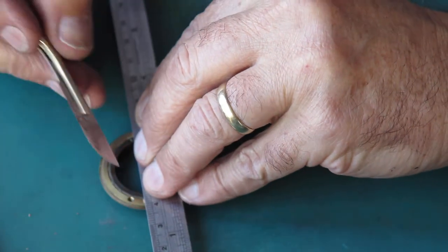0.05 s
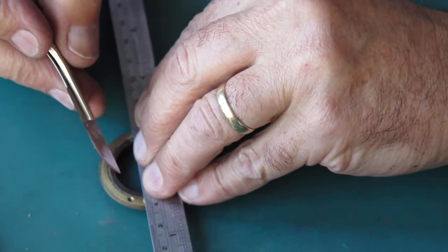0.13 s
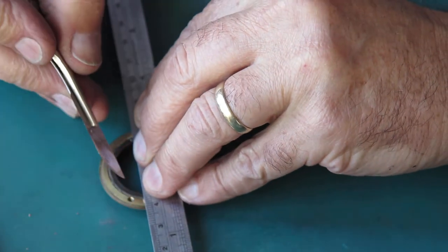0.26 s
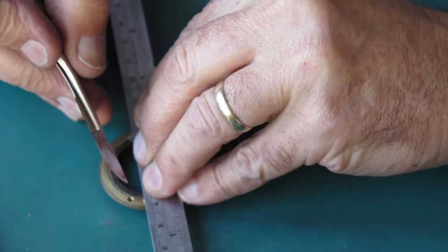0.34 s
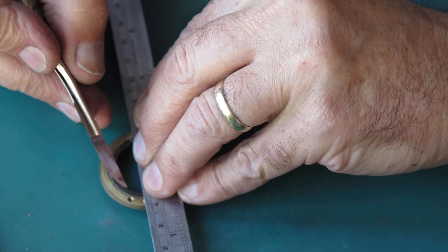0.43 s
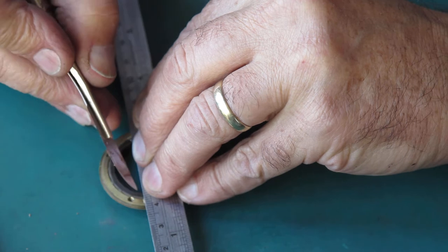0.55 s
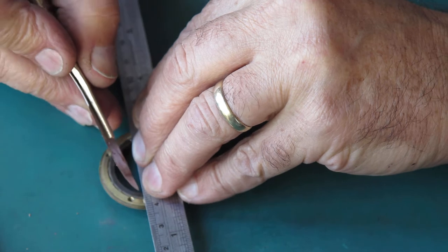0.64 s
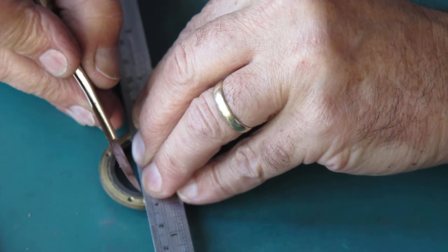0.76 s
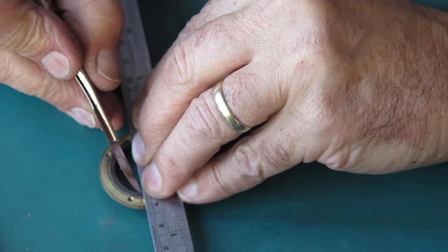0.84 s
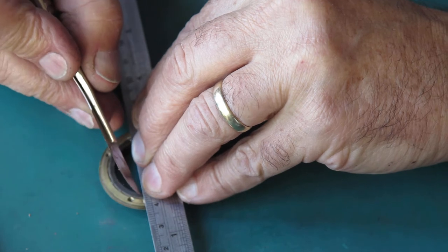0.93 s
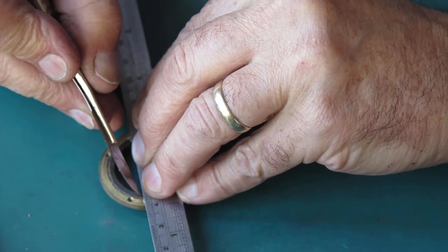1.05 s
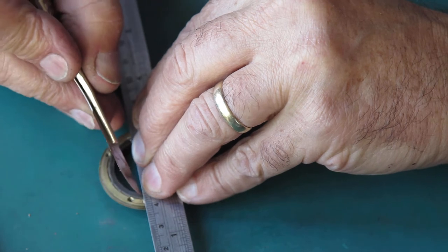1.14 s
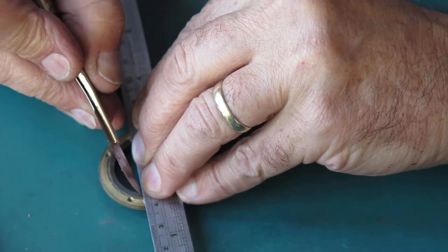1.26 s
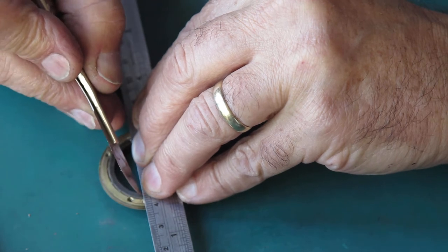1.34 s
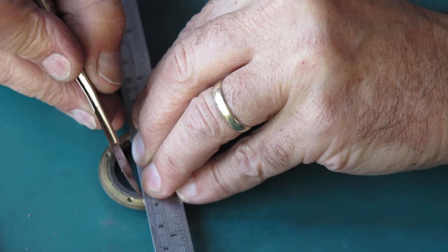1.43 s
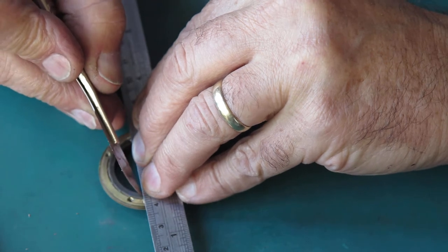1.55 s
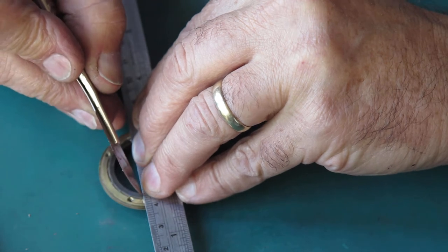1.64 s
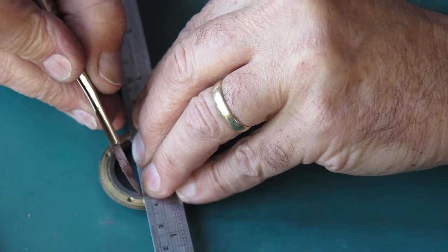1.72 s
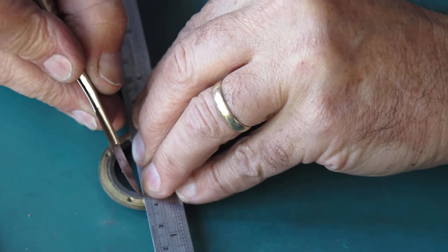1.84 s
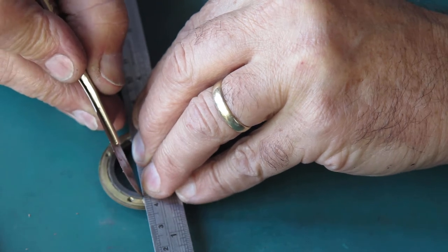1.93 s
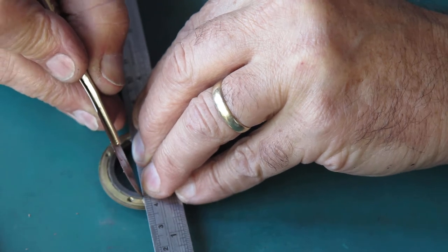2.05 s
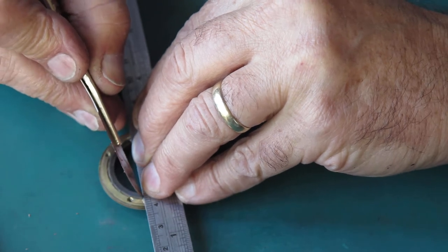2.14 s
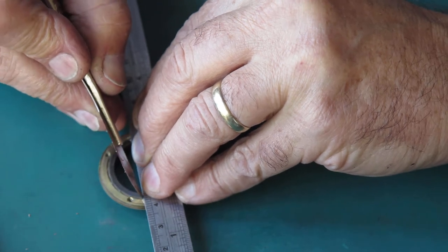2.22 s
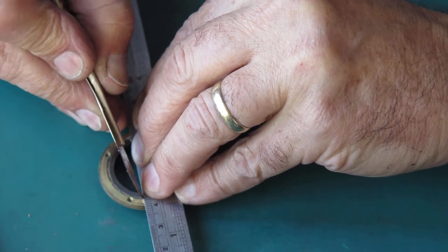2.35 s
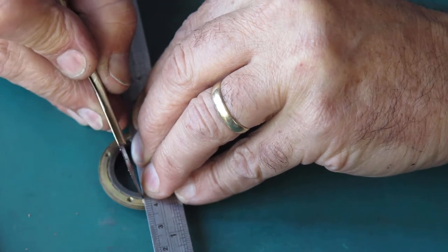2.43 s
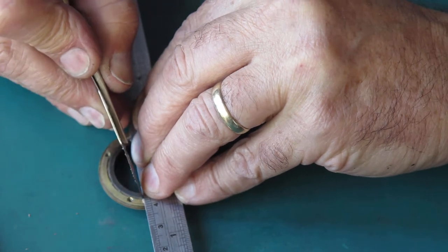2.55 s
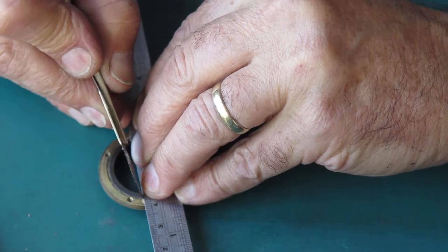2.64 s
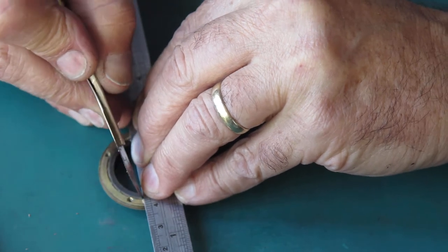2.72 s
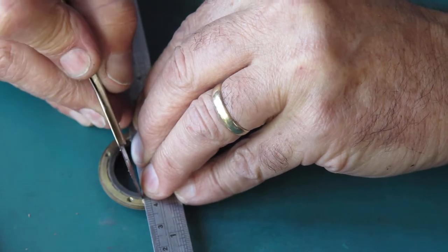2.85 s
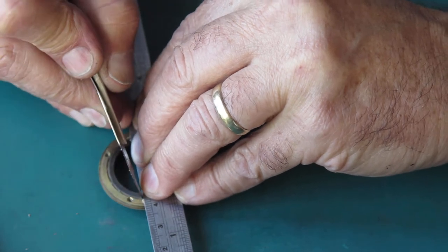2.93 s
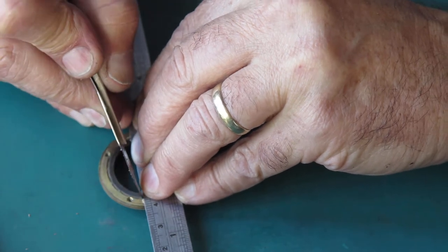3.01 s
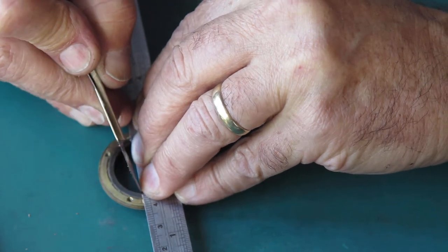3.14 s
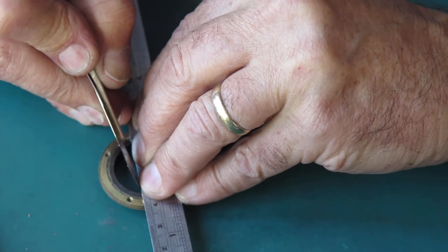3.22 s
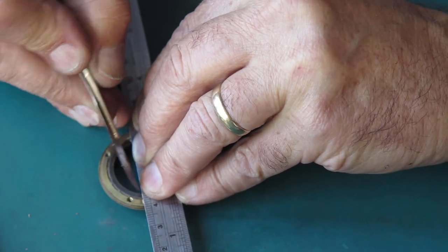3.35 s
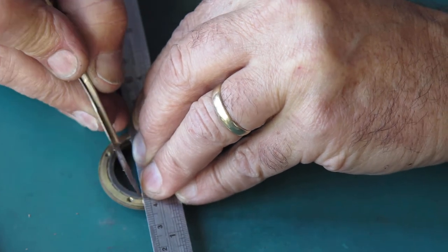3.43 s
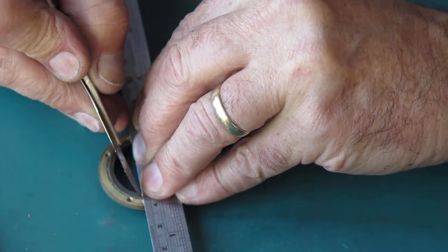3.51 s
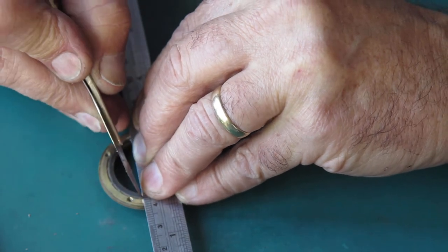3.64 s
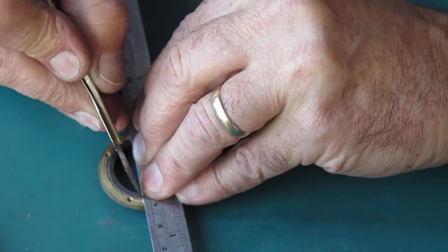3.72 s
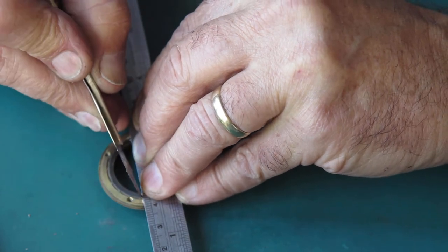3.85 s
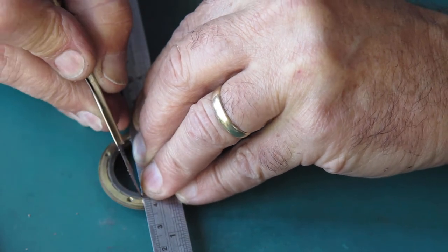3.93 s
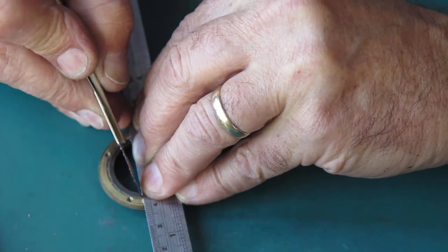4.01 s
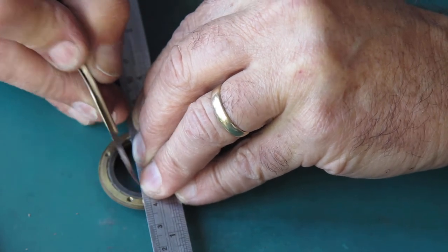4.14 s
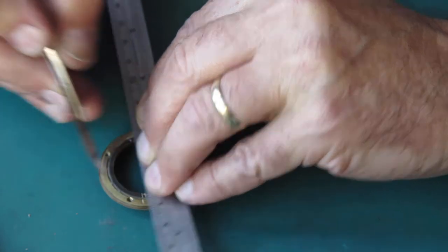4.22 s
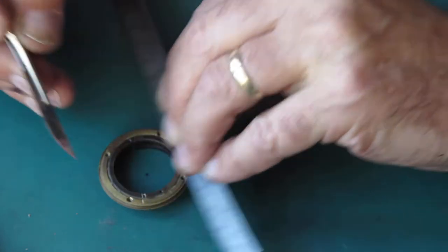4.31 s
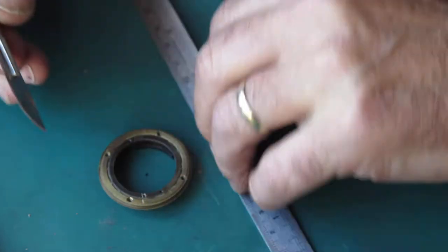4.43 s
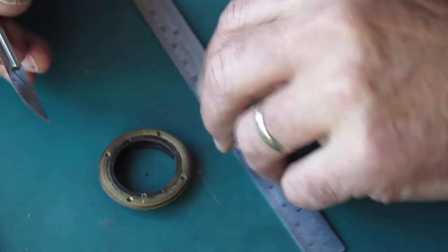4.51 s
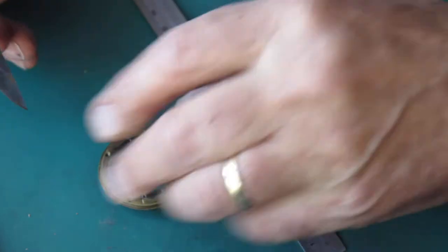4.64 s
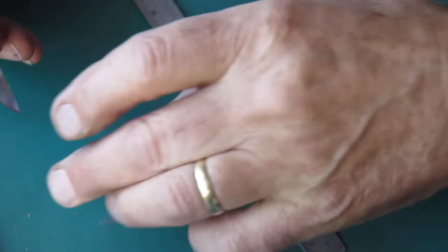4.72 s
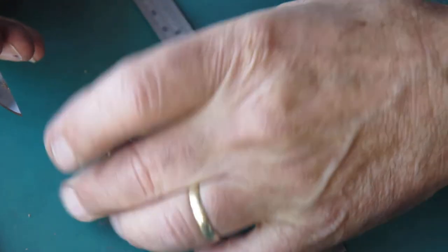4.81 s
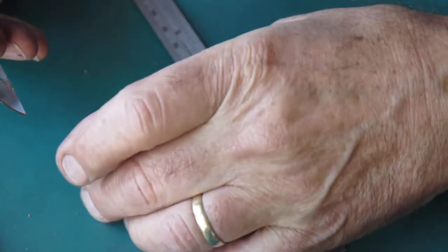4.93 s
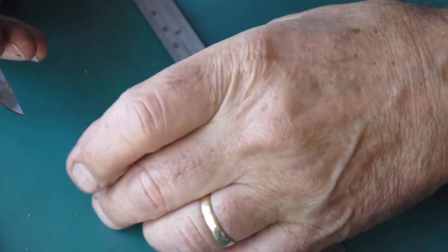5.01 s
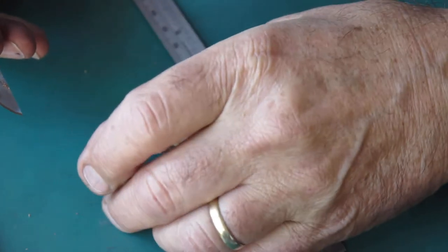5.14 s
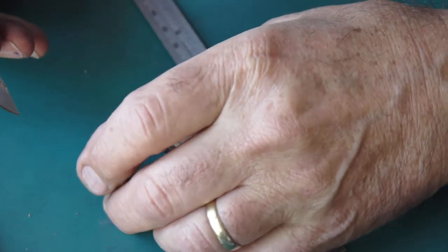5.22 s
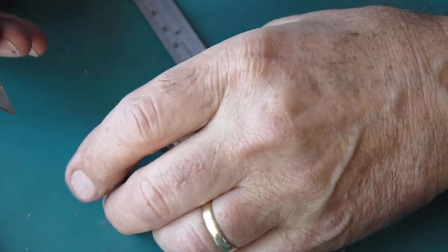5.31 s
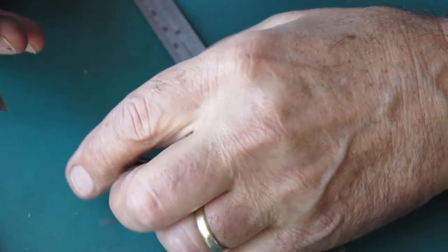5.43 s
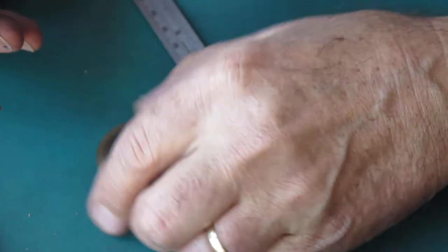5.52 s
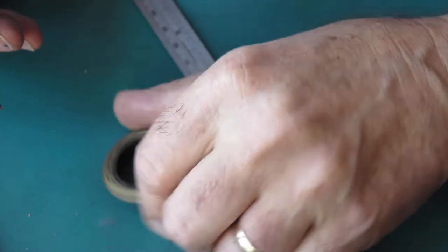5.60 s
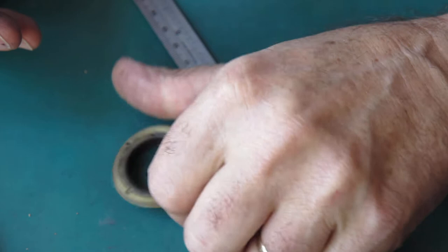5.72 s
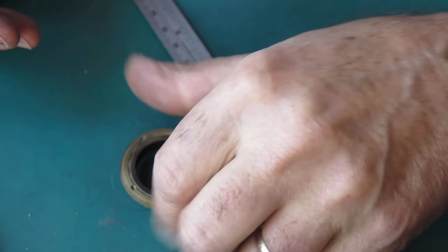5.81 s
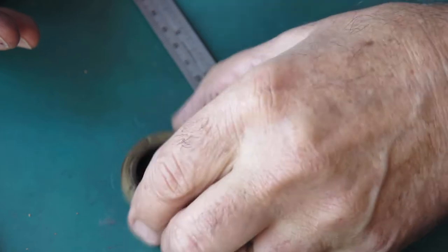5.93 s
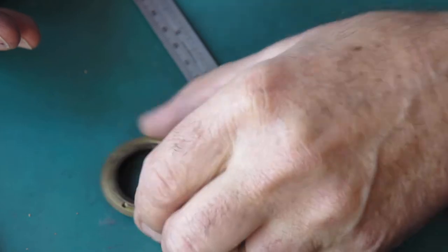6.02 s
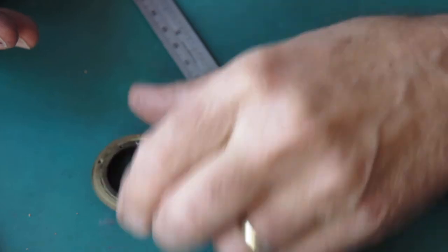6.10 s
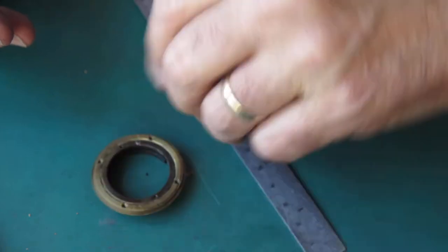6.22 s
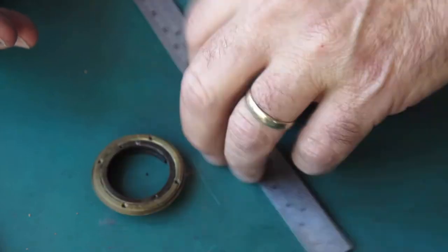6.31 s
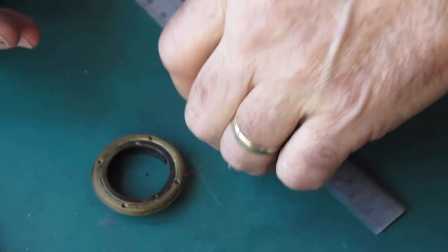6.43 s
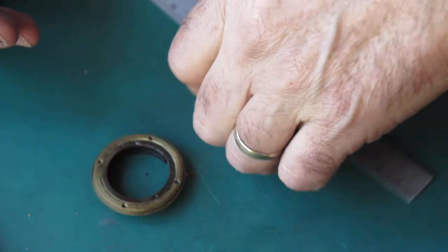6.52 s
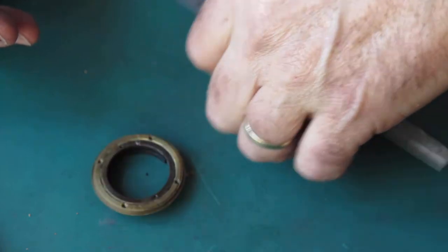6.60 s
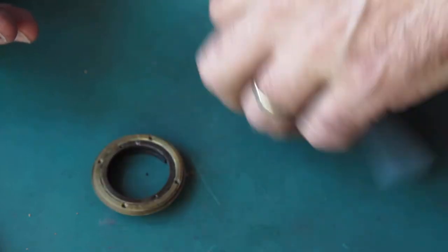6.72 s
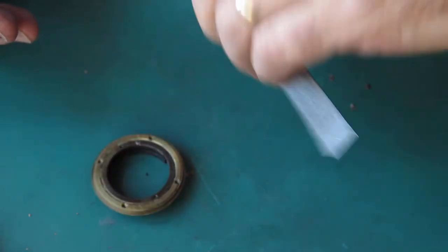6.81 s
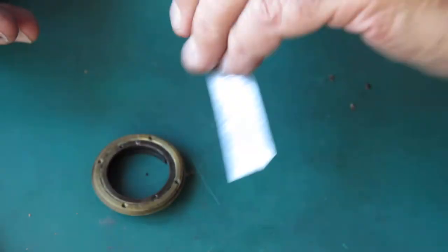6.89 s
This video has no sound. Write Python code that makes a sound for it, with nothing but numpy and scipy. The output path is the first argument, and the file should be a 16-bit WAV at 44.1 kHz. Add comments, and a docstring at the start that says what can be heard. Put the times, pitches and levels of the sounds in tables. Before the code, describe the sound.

Quiet close bench work: tiny scriber clicks, sudden metallic knocks, two buzzing slaps of a steel rule, soft rubbing and brief squeaks over steady hum.

```python
"""A small, fairly live room with a mat on a workbench: room air and a slightly wavering hum of mains and fan.
A steel scriber ticks and scrapes on a brass ring; the clicks are tiny impacts coloured like metal.
Ring and steel rule knock on the bench: each contact sums a thud, a clack, a click and the rule's modes.
The rule slaps down twice, bouncing into a buzz; filtered noise makes its strokes and the hand's rumble.
Gliding tones make its short squeaks near the end. Two ports close by hear it all through the room."""
import sys
import numpy as np
from scipy import signal
from scipy.fft import rfft, irfft
from scipy.io import wavfile

SR = 44100
rng = np.random.default_rng(int(sys.argv[2]) if len(sys.argv) > 2 else 0)


def materialize(psi):
    """Save the field psi as 16-bit PCM at rate SR to the path in sys.argv[1].

    A 1-D psi becomes a single channel; in a 2-D psi each row is a channel.
    """
    bounded = np.clip(np.atleast_2d(psi).T, -1, 1)
    quanta = np.round(bounded * 32767).astype(np.int16)
    wavfile.write(sys.argv[1], SR, quanta)


N = 306936

# Event levels are nominal: the trims in the functions and the room come on top.
# Spectrum of the room air. Each row: frequency in Hz, relative density in dB per Hz.
AIR_COLOUR = [(15, -39), (30, -16), (43, -8.5), (55, -14.5), (110, -5), (155, -12), (205, -8.5), (320, -10),
              (450, -14.5), (960, -18), (1500, -22), (7300, -28.5), (11300, -40), (16000, -62)]
# Swell of air and hum together. Each row: time in seconds, gain in dB.
AIR_SWELL = [(0, -2.5), (.5, -1.5), (1.2, 1), (4.4, 2), (4.65, -1.5), (5.1, 1.5), (6.96, 2)]
# Likeness of the air at the two ports. Each row: frequency in Hz, likeness from 0 to 1.
AIR_SHARED = [(40, 0.65), (150, 0), (600, 0), (2000, 0.057)]
# Hum of mains and fan. Each row: frequency in Hz, mean level in dB.
HUM_TONES = [(120, -64.5), (204.6, -65), (283.3, -56.5), (566, -68.5), (850, -73.5), (970, -71.5)]
AIR_DB = -50.5  # room air before its swell

# The hand leaning on the mat and letting go.
# Each row: time of most weight in seconds, level in dB, swell and fade time constant in seconds.
PRESSES = [(.11, -54, 0.064), (3.15, -49, 0.071), (4.1, -48, 0.11), (5.0, -52.5, 0.27), (5.36, -50, 0.095),
           (5.89, -43.5, 0.077), (6.72, -57, 0.27)]
# Colour of skin on the mat. Each row: frequency in Hz, gain in dB.
PALM_COLOUR = [(25, -11), (70, -3.5), (170, 5.5), (350, 0), (700, -15), (1500, -22), (5000, -36),
               (16000, -68)]

# The scriber's point catching on metal. Each row: start in seconds, level in dB.
TICKS = [(.1632, -47), (.322, -49.5), (0.4584, -48.5), (0.4778, -49), (0.713, -57), (.834, -54),
         (.844, -43), (1.441, -56), (1.916, -46.5), (2.753, -56), (2.948, -43), (4.173, -46.5),
         (4.2018, -43), (4.222, -43), (6.5323, -47.5), (6.748, -49)]
# Colour of those catches. Each row: frequency in Hz, gain in dB.
POINT_COLOUR = [(100, -55), (2200, -19), (3500, -5), (5500, -7), (7300, 1.5), (8600, -4.5), (12000, -19.5),
                (16000, -52)]
# Short drags of the point over the brass.
# Each row: start in seconds, length in seconds, level in dB, centre frequency in Hz.
SCRATCHES = [(0.951, 0.033, -59, 2230), (1.702, 0.0074, -52, 3070), (1.919, 0.04, -54, 1890),
             (1.96, 0.033, -54, 2400), (3.307, 0.051, -52, 4470), (4.049, 0.11, -53, 2340),
             (5.943, 0.028, -46, 3030)]

# Soft, thuddy contacts: fingertips bumping the parts into the mat, and the second contact
# of the hard knock at 3.21 s. Each row: start in seconds, thud level in dB, thud centre in Hz.
SOFT_CONTACTS = [(2.318, -53, 644), (3.165, -43.5, 324), (3.2165, -32.5, 675), (3.814, -49, 231),
                 (5.365, -48.5, 340), (5.7556, -34.5, 556), (6.066, -42, 416), (6.398, -40, 383)]
SOFT_CLACK_DB, SOFT_CLICK_DB = -15, -16.5  # against the thud: a soft contact stirs little metal
SOFT_DULL_HZ, SOFT_CONTACT_S = 5060, 0.0028

# Ring and rule knocking on each other and the bench. Each row: start in seconds, thud level in dB,
# thud centre in Hz, clack level in dB, steel click level in dB, frequency in Hz above which the click dulls.
KNOCKS = [(3.1156, -55, 920, -45, -63.5, 4050), (3.213, -23, 248, -29.5, -36, 12000),
          (3.5711, -41, 590, -49.5, -57, 4050), (3.6227, -51.5, 890, -47.5, -36.5, 14600),
          (4.0489, -47, 298, -47.5, -51, 6040), (4.0906, -31.5, 227, -49, -39.5, 13000),
          (4.2625, -41.5, 570, -36, -28.5, 15000), (4.297, -41.5, 532, -39.5, -37.5, 12000),
          (4.382, -35, 328, -32.5, -25, 8800), (4.5134, -51, 400, -47, -39, 10100),
          (5.8124, -31, 520, -43, -38.5, 5700), (5.8457, -29, 430, -34, -31, 6100)]
# Free blows that leave the metal ringing. Each row: start in seconds, level in dB.
RINGS = [(3.2135, -38), (3.6222, -44.5), (6.3093, -48)]
# Nominal contact time for a click of the given level; it halves for a click so many dB louder.
CONTACT_S, CONTACT_AT_DB, CONTACT_HALVES_DB = 0.0021, -35, 12

# The rule landing flat, bouncing and buzzing to rest. Each row: start in seconds, thud level in dB,
# thud centre in Hz, clack level in dB, steel click level in dB, first bounce gap in seconds,
# change per bounce in dB, buzz level in dB.
SLAPS = [(4.441, -38.5, 320, -35.5, -28, .0046, -0.2, -58), (6.309, -34, 293, -29, -25.5, .0078, -5, -28)]
BOUNCE_SHRINK = 0.88  # each gap is this share of the last
SLAP_CONTACT_S, SLAP_DULL_HZ = 0.0026, 10800
BUZZ_S, BUZZ_CLACK_DB = 0.031, -5.5  # nominal decay of the buzz, and its clack against its click

# Strokes of the rule and fingers over the mat. Each row: start in seconds, length in seconds, level in dB.
STROKES = [(4.77, .85, -65), (5.46, 0.21, -57), (5.86, 0.27, -54.5), (6.174, 0.18, -54), (6.42, .13, -40.5),
           (6.5, 0.22, -56), (6.822, .25, -63)]
# Colour of that rubbing. Each row: frequency in Hz, gain in dB.
RUB_COLOUR = [(150, -18), (400, -13), (1300, 5), (2300, -5), (3500, 0.5), (5500, -2), (7100, 2.5),
              (8600, -5), (12000, -19), (14000, -37), (16000, -49)]
STROKE_EASE = 0.57  # share of a stroke spent speeding up and slowing down
# The rule's end juddering on the mat. Each row: start in seconds, length in seconds, level in dB,
# start pitch in Hz, end pitch in Hz, roughness from 0 to 1.
SQUEAKS = [(6.492, 0.026, -42, 1190, 1375, 0.28), (6.593, 0.018, -34.5, 1053, 1505, 0.21),
           (6.602, 0.021, -31.5, 1685, 1200, 0.23), (6.654, 0.0123, -40, 1710, 960, 0.93),
           (6.7053, 0.006, -39, 1660, 1830, 0.79)]

# Resonances of bench, metal and rule, before each blow's random spread.
# Each row: frequency in Hz, relative level in dB, time to fall 60 dB in seconds.
BENCH_MODES = [(176, -6, 0.24), (245, -11, 0.13), (321, 5, 0.088), (433, -13, 0.17), (493.7, -0.5, 0.31),
               (617, 2, 0.21), (759, 6, 0.24), (856, -18, 0.12), (1180, 6, .1)]
METAL_MODES = [(3570, 3, 0.063), (4500, -19, 0.053), (6200, -18, 0.045), (6960, -4, 0.051),
               (8730, 10, 0.07), (9350, 6, 0.12), (9700, -1, 0.16), (12100, -21, .07), (12600, 0, 0.086)]
RULE_MODES = [(898, 4, 0.071), (1070, 2, 0.078), (1358, -5.5, 0.17), (1800, -17, 0.13), (2280, -7.5, .16)]
# The rule's level against the clack, and dB gained per dB by which the clack outweighs the click.
RULE_DB, RULE_PER_DULL_DB = -14, 1.0
# Colours of a steel click and of a clack. Each row: frequency in Hz, gain in dB.
CLICK_COLOUR = [(100, -61), (1200, -56), (2500, -7.5), (3300, 1), (4400, -0.5), (5200, -3), (6400, -3.5),
                (7400, -1), (8600, -8), (11500, -14), (13000, -19), (14200, -33), (16000, -39)]
CLACK_COLOUR = [(50, -50), (400, -18), (900, -1), (1350, -5.5), (1900, -2.5), (2500, -8.5), (3300, -11),
                (6000, -23.5), (14000, -57)]

# Decay of the room's tail. Each row: frequency in Hz, time to fall 60 dB in seconds.
ROOM_T60 = [(100, 0.18), (400, 0.3), (1500, 0.33), (4000, 0.33), (7500, 0.31), (14000, 0.29)]
# Colour of the tail. Each row: frequency in Hz, gain in dB.
ROOM_COLOUR = [(100, -2.5), (400, -2.5), (1500, -3.5), (4000, -7.5), (7500, -3.5), (14000, -11)]
# Likeness of the tail at the two ports. Each row: frequency in Hz, likeness from 0 to 1.
ROOM_SHARED = [(100, 0.86), (1000, 0.74), (4000, 0.45), (9000, 0)]
# Treble thrown about by hands and tools. Each row: frequency in Hz, gain in dB.
SCATTER_COLOUR = [(500, -18), (3000, -22.5), (6000, -15.5), (9000, -3.5), (14000, -11.5)]
# Echoes off the bench and wall. Each row: delay in seconds, left gain, right gain.
ECHOES = [(.0021, 0.13, .2), (.0043, 0.12, 0.18), (0.0114, .14, .27), (0.013, 0.04, 0.12)]
# Left port against right; the scene shares it out between them. Each row: frequency in Hz, difference in dB.
LEFT_OVER_RIGHT = [(60, 5), (500, 3.5), (2000, 1.5), (4000, -0.5), (6500, -10), (8000, -9.5), (9500, 9),
                   (11500, 10), (14000, 12)]

LEVEL_SPAN_S = 0.015  # a blow's level is its energy spread over this time
EDGE_HZ = 16000  # top of the recorder's band


def amp(db):
    """Decibels to gain."""
    return 10 ** (np.asarray(db) / 20)


def evened(x):
    """Scales to an rms of one."""
    return x / np.sqrt(np.mean(x ** 2) + 1e-20)


def blow(x, db):
    """Scales a short sound so that its energy gives the wanted level."""
    energy = np.sum(x ** 2) + 1e-20
    return amp(db) * x * np.sqrt(LEVEL_SPAN_S * SR / energy)


def read(points, hz):
    """Reads a table on a log-frequency axis."""
    f, value = np.transpose(points)
    return np.interp(np.log(hz + 1), np.log(f + 1), value)


def curve(points):
    """Reads a table of time and value at every sample."""
    return np.interp(np.arange(N) / SR, *np.transpose(points))


def add(mix, s, sound):
    """Mixes a sound in at a time in seconds."""
    part = mix[round(s * SR):][:len(sound)]
    part += sound[:len(part)]


def colour(x, points, share=1, size=2048):
    """Causal minimum-phase filter with the given spectrum, or a share of its dB."""
    hz = abs(np.fft.fftfreq(size, 1 / SR))
    log_gain = np.log(amp(share * read(points, hz)))
    taps = np.fft.ifft(np.exp(np.conj(signal.hilbert(log_gain)))).real
    return signal.fftconvolve(x, taps[:size // 2])[:len(x)]


def drift(seconds):
    """Smooth random wandering with an rms of one, its knots this far apart."""
    knots = rng.standard_normal(int(N / SR / seconds) + 2)
    position = np.arange(N) / SR / seconds
    return evened(np.interp(position, np.arange(len(knots)), knots))


def alike(first, other, same):
    """Blends two independent signals into one with the given likeness to the first."""
    return same * first + np.sqrt(1 - same ** 2) * other


def background():
    """Room air, alike at the two ports only in the bass, and a slightly wavering hum."""
    left, other = rfft(rng.standard_normal((2, N)))
    same = np.clip(read(AIR_SHARED, np.fft.rfftfreq(N, 1 / SR)), 0, 1)
    spectra = (left, alike(left, other, same))
    air = np.array([evened(colour(irfft(z, N), AIR_COLOUR, size=8192)) for z in spectra])
    t = np.arange(N) / SR
    hum = np.zeros(N)
    for hz, db in HUM_TONES:
        level = np.sqrt(2) * amp(db + 1.46 * drift(0.15))
        hum += level * np.sin(2 * np.pi * hz * t + 0.2 * drift(0.2))
    balance = amp([[0.4], [-0.4]])  # a touch louder on the left
    return (amp(AIR_DB) * air + hum) * amp(curve(AIR_SWELL)) * balance


def hand(lump_db=3, lump_s=0.027, trim_db=-2):
    """Skin pressing and rolling on the mat: a soft, lumpy rumble that swells and fades with each press."""
    t = np.arange(N) / SR
    swells = [amp(db) * np.exp(-abs(t - s) / swell_s) for s, db, swell_s in PRESSES]
    weight = np.max(swells, axis=0)
    rumble = evened(colour(rng.standard_normal(N), PALM_COLOUR))
    return rumble * weight * amp(trim_db + lump_db * drift(lump_s))


def chatter(decay, clump_db=4.5, size=16384):
    """Hard contact: a dying flurry of tiny impacts that come in clumps."""
    t = np.arange(size) / SR
    knots = t[::40]
    clumps = amp(clump_db * np.interp(t, knots, rng.standard_normal(len(knots))))
    envelope = np.exp(-t / decay) * (1 - np.exp(-t / 0.00032))
    return rng.standard_normal(size) * clumps * envelope


def ticks(decay=0.0018, trim_db=-1):
    """The point slips and catches: tiny, bright clicks."""
    out = np.zeros(N)
    for s, db in TICKS:
        add(out, s, blow(colour(chatter(decay), POINT_COLOUR), db + trim_db))
    return out


def scratches(skirt_db=-13):
    """The point drags a short way: fine grit through one broad resonance of the blade."""
    out = np.zeros(N)
    for s, length, db, hz in SCRATCHES:
        resonance = [(hz / 4, -28), (hz * 0.28, -8), (hz, 0), (hz * 1.6, skirt_db),
                     (7500, -11), (11000, -25), (15000, -50)]
        n = round(length * SR)
        grit = colour(chatter(length), resonance)[:n]
        add(out, s, amp(db) * evened(grit * signal.windows.tukey(n, 0.5)))
    return out


def ring(modes, split=0.0128, count=3, size=16384):
    """Dying modes; each splits into close, beating partials that shift with the grip."""
    t = np.arange(size) / SR
    out = np.zeros(size)
    for hz, db, t60 in modes:
        for _ in range(count):
            level = amp(db + 2 * rng.standard_normal() - 60 * t / t60)
            pitch = hz * (1 + split * rng.standard_normal())
            out += level * np.sin(2 * np.pi * pitch * t)
    return out


def thud(hz, cycles=0.49, bench_db=-5, rattle_db=-7, rattle_s=0.017, low_hz=125, size=16384):
    """A brief push into the mat; bench modes near its pitch ring on and loose things rattle."""
    t = np.arange(size) / SR
    push = np.sin(2 * np.pi * hz * t) * np.exp(-hz * t / cycles) * (1 - np.exp(-t / 0.0007))
    # modes weaken with their distance from the push in octaves
    modes = [(f, db - 7 * np.log2(f / hz) ** 2, t60) for f, db, t60 in BENCH_MODES]
    rattle_colour = [(hz / 2, -20), (hz, -2), (hz * 1.59, 0), (hz * 3, -20), (hz * 10, -55)]
    rattle = colour(chatter(rattle_s), rattle_colour)
    body = evened(push) + amp(bench_db) * evened(ring(modes)) + amp(rattle_db) * evened(rattle)
    # a small bench radiates no deep bass
    return signal.sosfilt(signal.butter(3, low_hz, "high", fs=SR, output="sos"), body)


def strike(thud_level_db, hz, clack_level_db, click_level_db, dull_hz, decay,
           thud_db=0, clack_db=-1, click_db=-1, dull_db=-22):
    """One contact thuds into the bench, clacks and clicks; a dull one mostly bends the rule, which sings on."""
    softness = [(dull_hz, 0), (2 * dull_hz, dull_db)]
    click = colour(colour(chatter(decay * 1.13), CLICK_COLOUR), softness)
    clack = colour(chatter(decay + 0.0023), CLACK_COLOUR)  # the clack outlasts the nominal contact
    dullness_db = clack_level_db - click_level_db
    rule_db = clack_level_db + RULE_DB + RULE_PER_DULL_DB * dullness_db
    return (blow(thud(hz), thud_level_db + thud_db)
            + blow(clack, clack_level_db + clack_db)
            + blow(click, click_level_db + click_db)
            + blow(ring(RULE_MODES, count=2), rule_db))


def soft_contacts():
    """Soft contacts: mostly thud, with a trace of metal."""
    out = np.zeros(N)
    for s, db, hz in SOFT_CONTACTS:
        contact = strike(db, hz, db + SOFT_CLACK_DB, db + SOFT_CLICK_DB, SOFT_DULL_HZ, SOFT_CONTACT_S)
        add(out, s, contact)
    return out


def knocks():
    """Single knocks: the louder the click, the shorter the contact; a free blow sets the metal ringing."""
    out = np.zeros(N)
    for s, low_db, hz, mid_db, high_db, dull_hz in KNOCKS:
        decay = CONTACT_S * 2 ** ((CONTACT_AT_DB - high_db) / CONTACT_HALVES_DB)
        add(out, s, strike(low_db, hz, mid_db, high_db, dull_hz, decay))
    for s, db in RINGS:
        add(out, s, blow(ring(METAL_MODES, split=0.017, count=5), db))
    return out


def slaps(buzz_thud_db=-16, count=3):
    """The rule bounces ever sooner and weaker, until the bounces give way to a buzz."""
    out = np.zeros(N)
    for s, low_db, hz, mid_db, high_db, gap, step_db, buzz_db in SLAPS:
        for k in range(count):
            bounce = strike(low_db, hz, mid_db, high_db, SLAP_DULL_HZ, SLAP_CONTACT_S)
            add(out, s, amp(k * step_db) * bounce)
            s += gap * BOUNCE_SHRINK ** k
        buzz = strike(buzz_db + buzz_thud_db, hz, buzz_db + BUZZ_CLACK_DB, buzz_db, SLAP_DULL_HZ, BUZZ_S)
        add(out, s, buzz)
    return out


def slide(grains_per_s=2200, trim_db=-2):
    """Dense grains of friction under the moving rule; each stroke eases in and out."""
    speed = np.zeros(N)
    for s, length, db in STROKES:
        add(speed, s, amp(db) * signal.windows.tukey(round(length * SR), STROKE_EASE))
    grains = rng.standard_normal(N) * (rng.random(N) < grains_per_s / SR)
    return evened(colour(grains, RUB_COLOUR)) * speed * amp(trim_db + 0.91 * drift(0.025))


def squeaks(overtone=2.35, overtone_db=-10, grit_db=-1, wobble=0.304):
    """Stick and slip bends the rule: a gliding tone, a higher bending mode and some grit."""
    grit_colour = [(500, -5.5), (1000, -7), (1800, 2.5), (2200, -8.5), (3400, 0),
                   (5500, -12.0), (10000, -28), (15000, -54)]
    out = np.zeros(N)
    for s, length, db, start_hz, end_hz, rough in SQUEAKS:
        n = round(length * SR)
        jitter = 1 + wobble * rough * drift(0.0008)[:n]
        phase = 2 * np.pi * np.cumsum(np.linspace(start_hz, end_hz, n) * jitter) / SR
        tone = np.sin(phase) + amp(overtone_db) * np.sin(overtone * phase)
        grit = evened(colour(chatter(length), grit_colour)[:n])
        squeak = tone + amp(grit_db) * np.sqrt(rough) * grit
        add(out, s, amp(db) * evened(squeak * signal.windows.tukey(n, 0.6)))
    return out


def room(x, dense_s=0.04, build_s=0.0045, scatter_s=0.0008, size=24000):
    """Direct sound, scatter near the ports, echoes off the bench and wall, and a short tail that thickens."""
    age = np.arange(size) / SR
    density = np.minimum(0.03 + (age / dense_s) ** 2, 1)
    taps = rng.standard_normal((2, size)) * (rng.random(size) < density) / np.sqrt(density)
    hz, t, z = signal.stft(taps, SR, nperseg=256)
    same = np.clip(read(ROOM_SHARED, hz), 0, 1)[:, None]
    z[1] = alike(z[0], z[1], same)
    decay = amp(-60 * t / read(ROOM_T60, hz)[:, None])
    tail = signal.istft(z * decay, SR, nperseg=256)[1][:, :size]
    tail *= 1 - np.exp(-age / build_s)
    near = rng.standard_normal((2, size)) * np.exp(-age / scatter_s) * (age > 0)
    response = np.array([colour(far / np.linalg.norm(far), ROOM_COLOUR)
                         + colour(close / np.linalg.norm(close), SCATTER_COLOUR)
                         for far, close in zip(tail, near)])
    response[:, 0] += 1  # direct sound
    for delay, *gains in ECHOES:
        response[:, round(delay * SR)] += gains
    return signal.fftconvolve(x[None], response, axes=1)[:, :N]


def scene():
    """The bench work reaches each port with its own colour, over the air and hum."""
    handling = hand() + slide() + squeaks()
    scriber = ticks() + scratches()
    contacts = soft_contacts() + knocks() + slaps()
    left, right = room(handling + scriber + contacts)
    work = np.array([colour(left, LEFT_OVER_RIGHT, 0.47), colour(right, LEFT_OVER_RIGHT, -0.48)])
    return work + background()


def record(dry):
    """The recorder's band limit: a steep low-pass."""
    low_pass = signal.firwin(255, EDGE_HZ, window=("kaiser", 9), fs=SR)
    return signal.oaconvolve(dry, low_pass[None], "same")


dry = scene()
out = record(dry)
materialize(out)
```